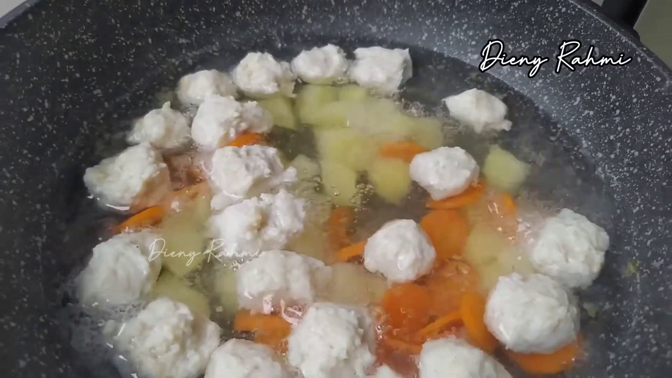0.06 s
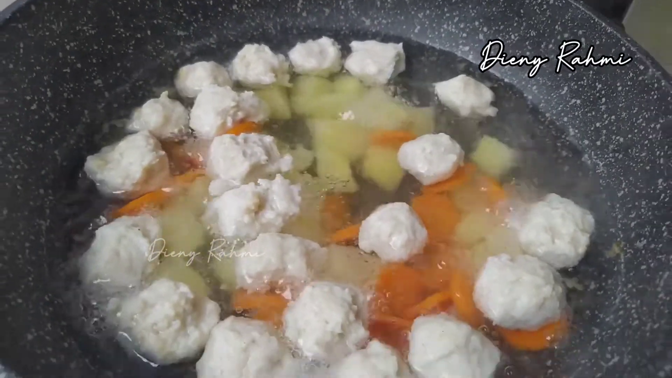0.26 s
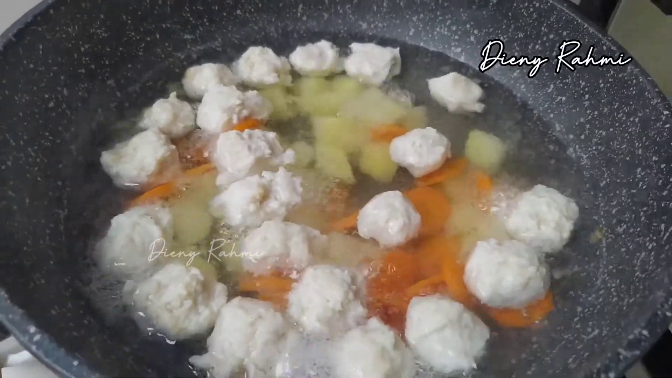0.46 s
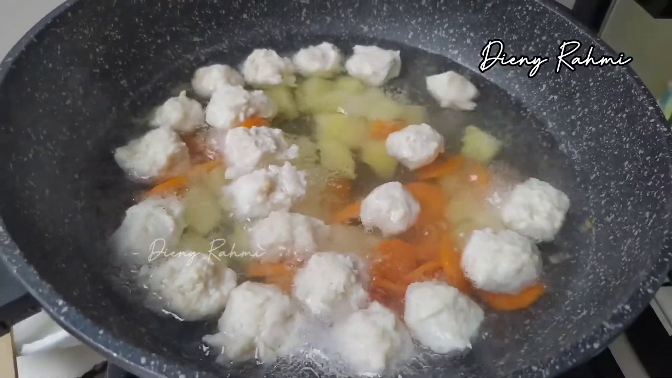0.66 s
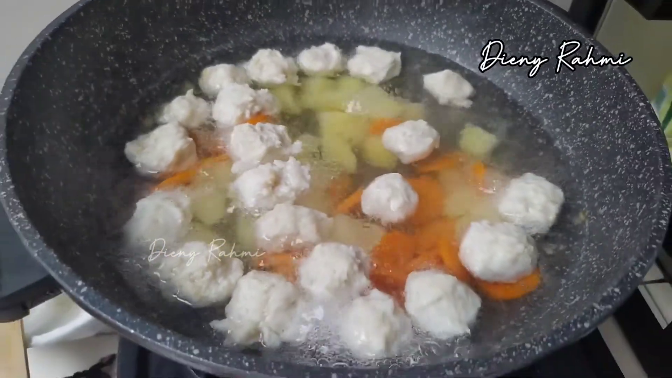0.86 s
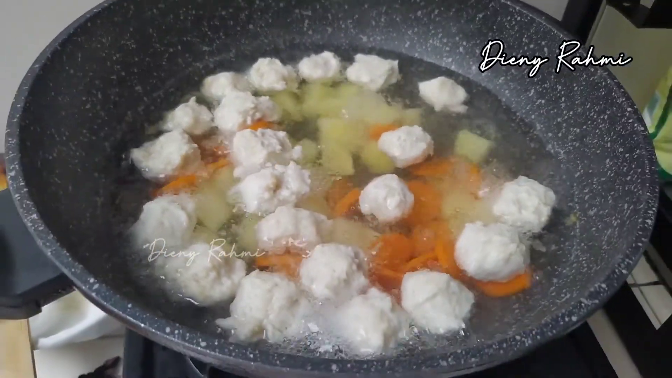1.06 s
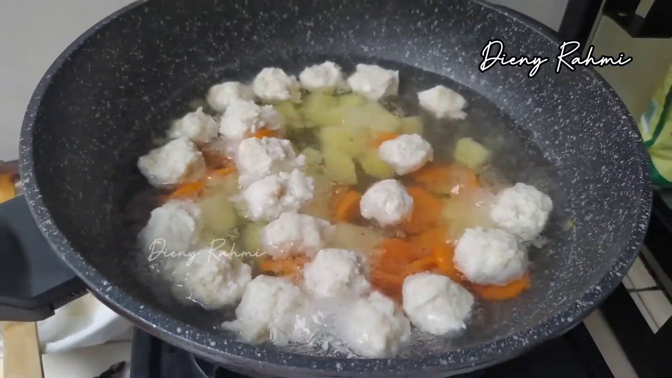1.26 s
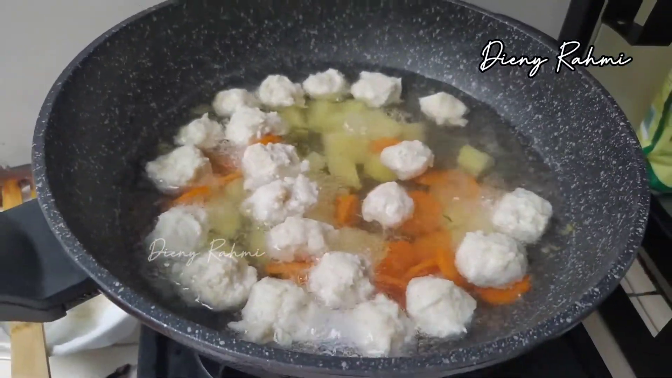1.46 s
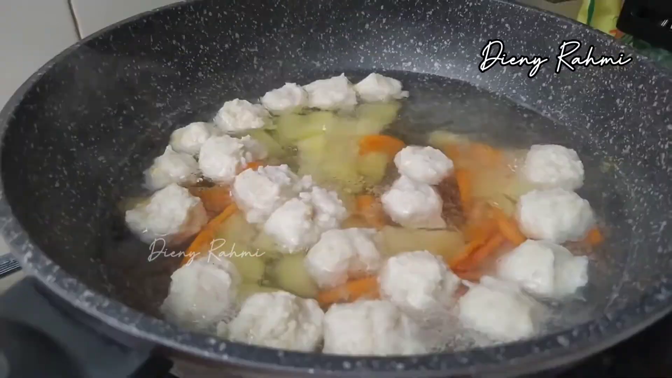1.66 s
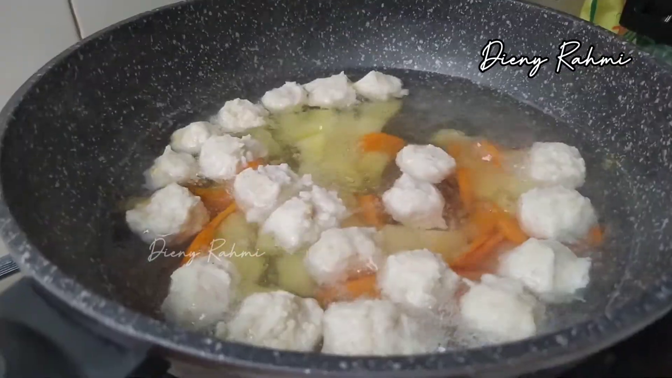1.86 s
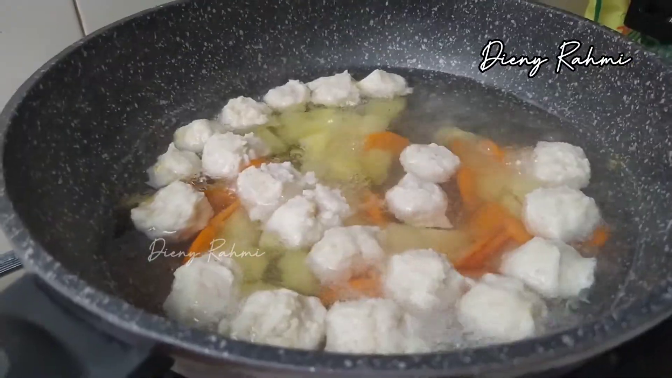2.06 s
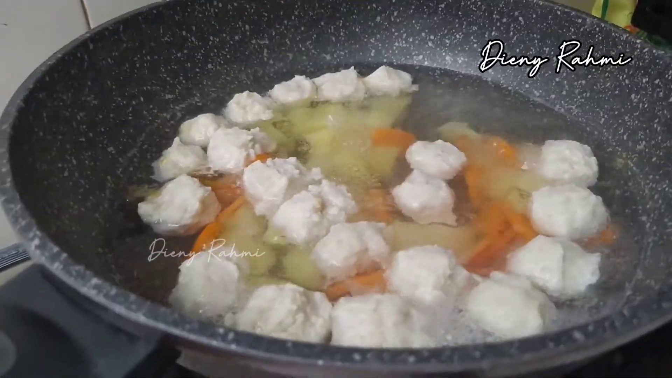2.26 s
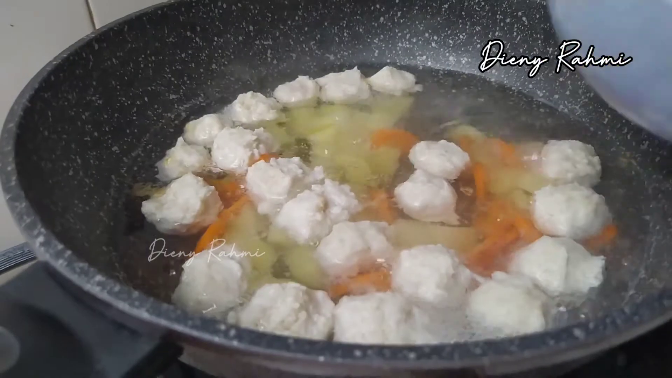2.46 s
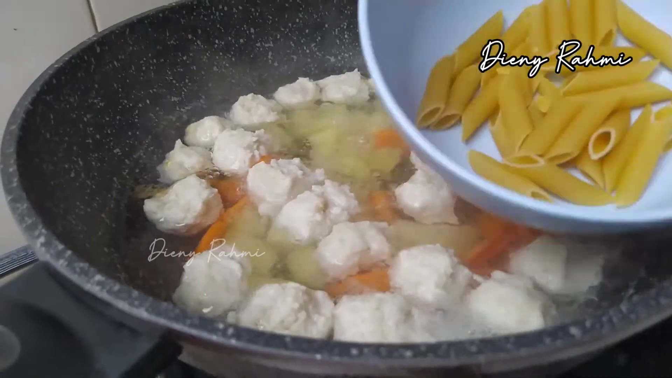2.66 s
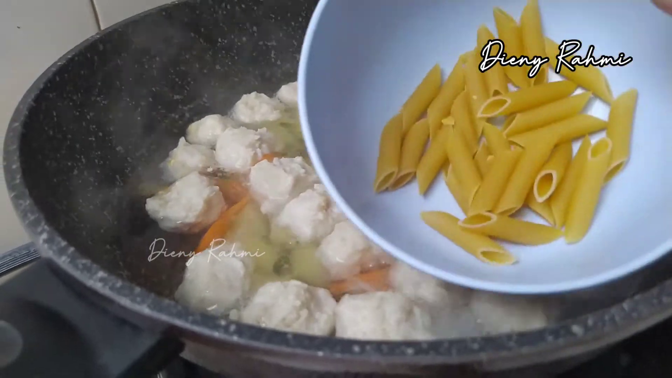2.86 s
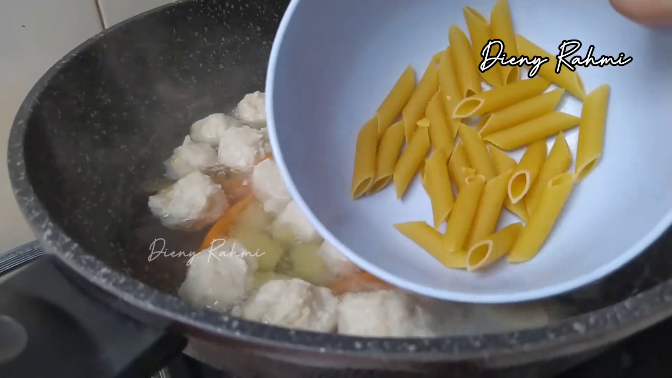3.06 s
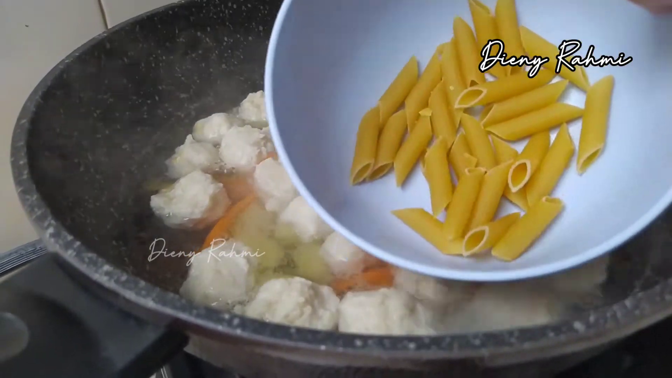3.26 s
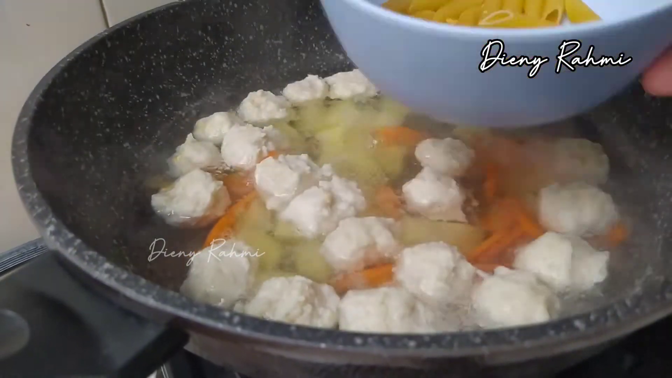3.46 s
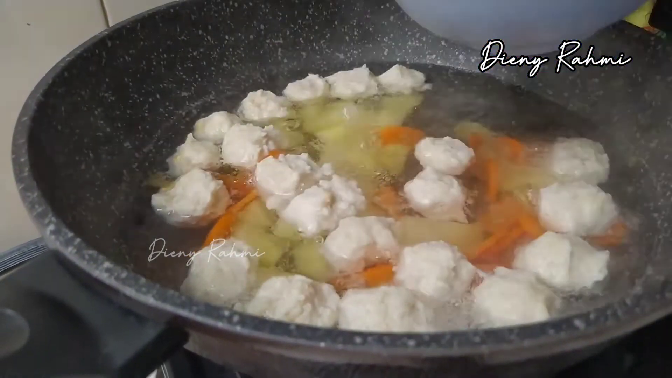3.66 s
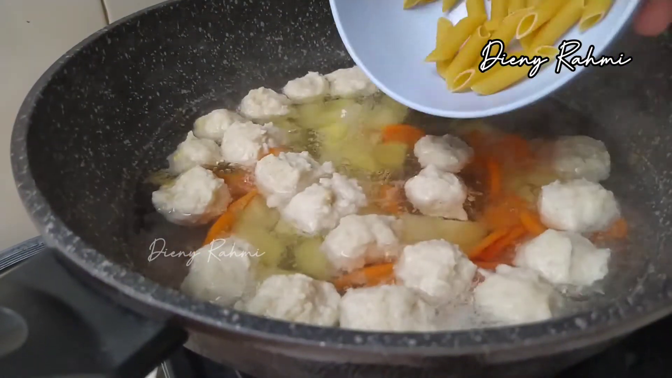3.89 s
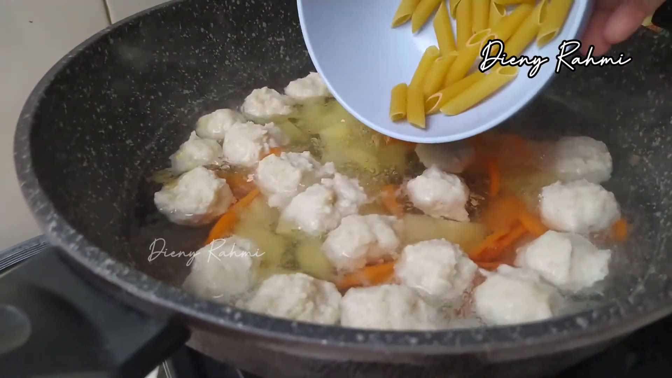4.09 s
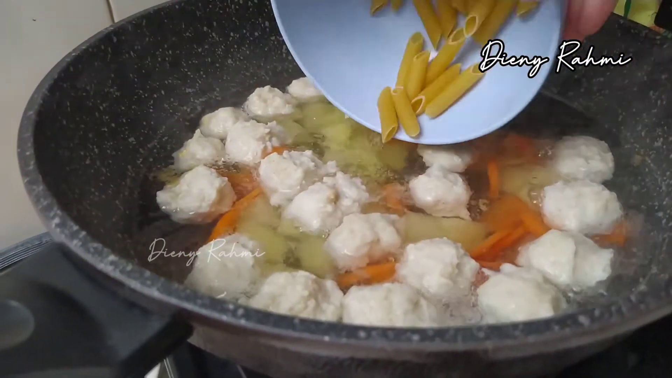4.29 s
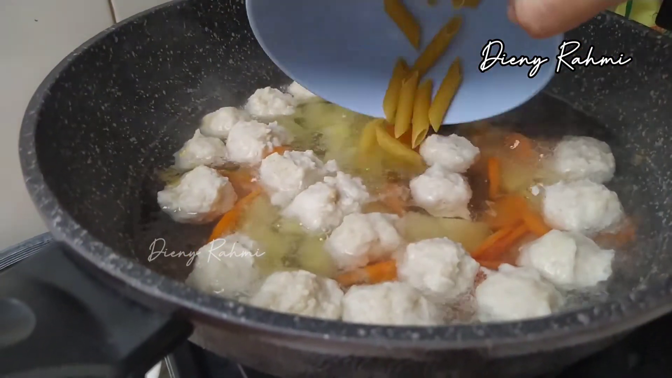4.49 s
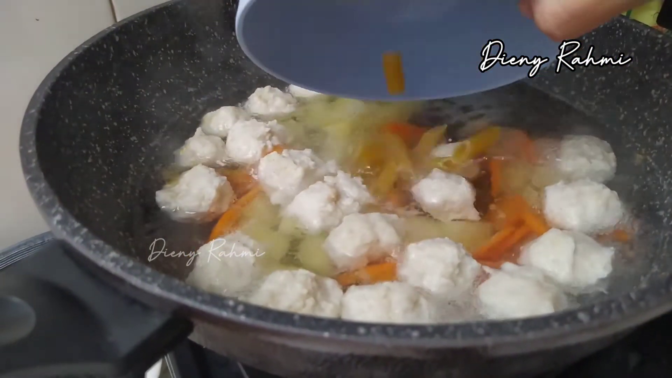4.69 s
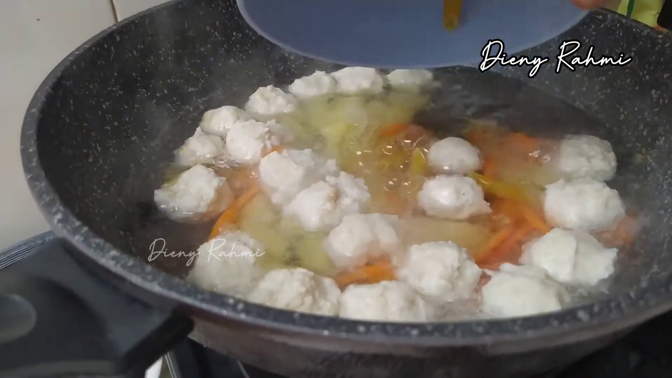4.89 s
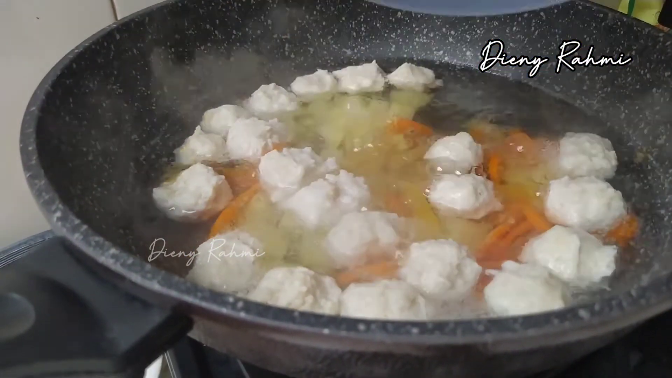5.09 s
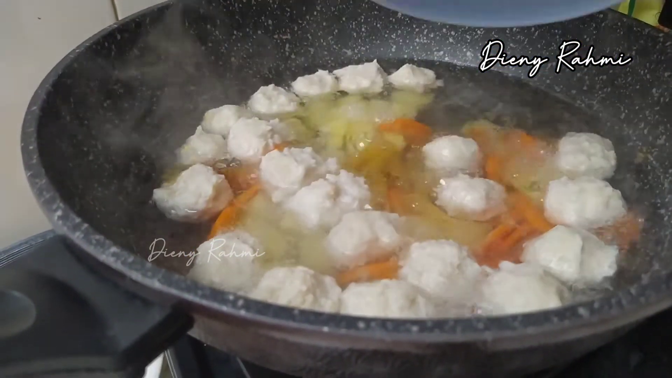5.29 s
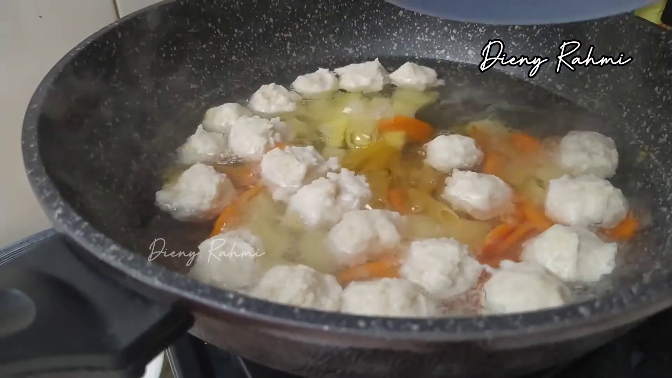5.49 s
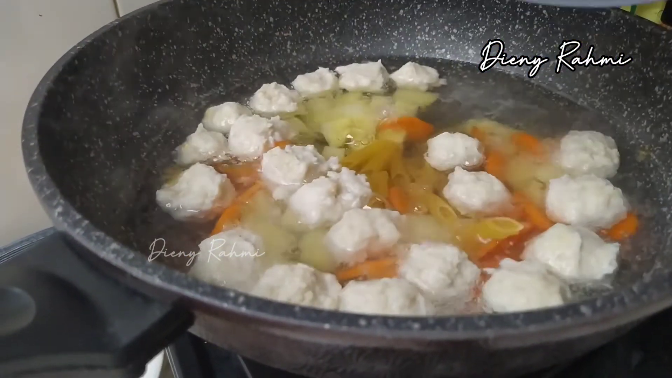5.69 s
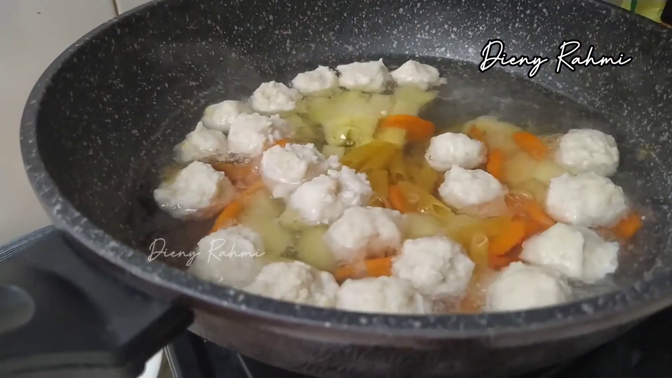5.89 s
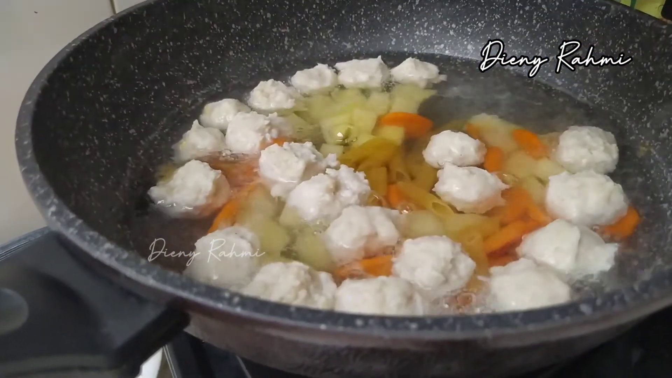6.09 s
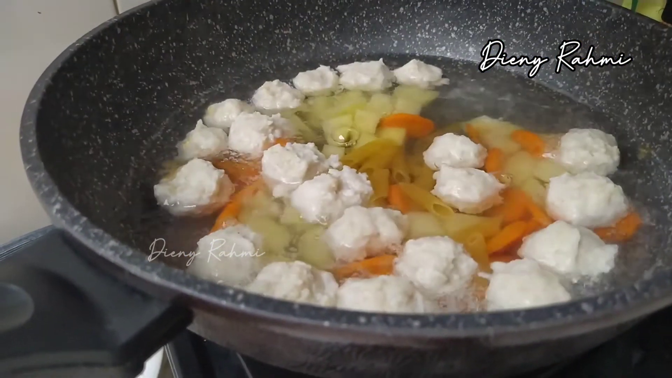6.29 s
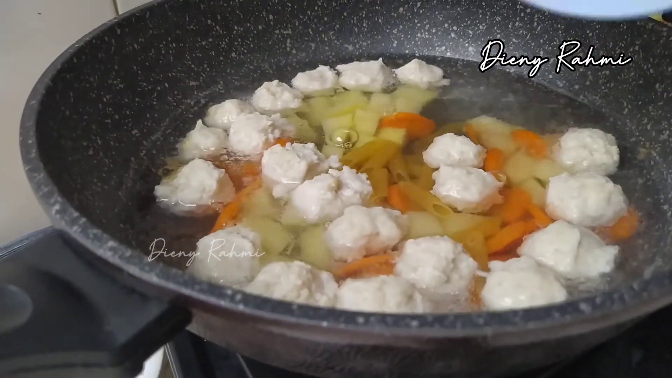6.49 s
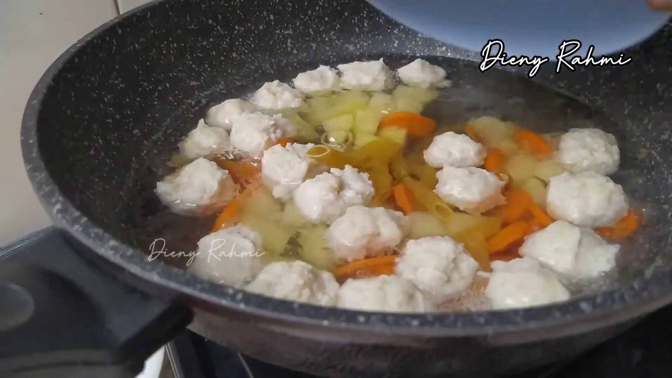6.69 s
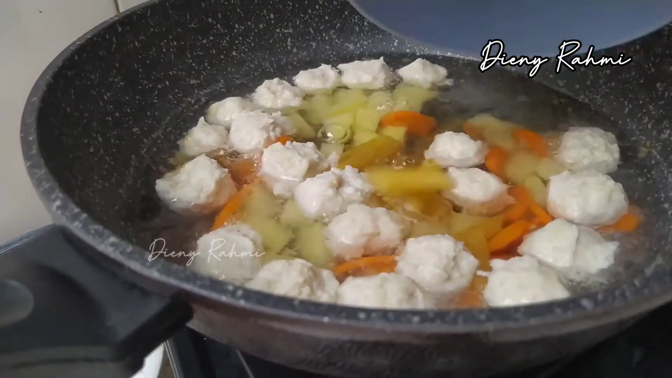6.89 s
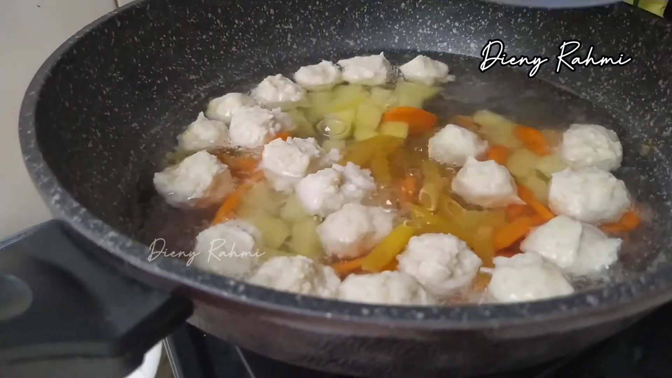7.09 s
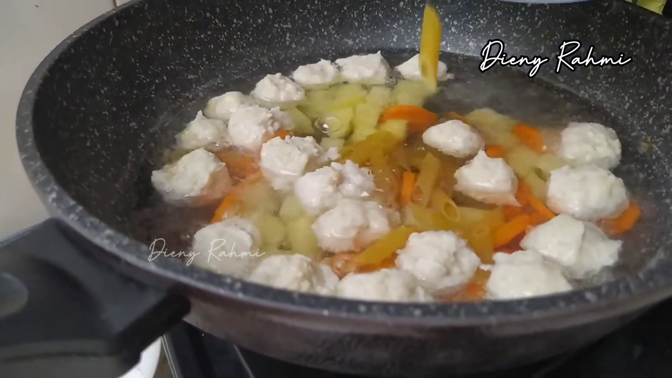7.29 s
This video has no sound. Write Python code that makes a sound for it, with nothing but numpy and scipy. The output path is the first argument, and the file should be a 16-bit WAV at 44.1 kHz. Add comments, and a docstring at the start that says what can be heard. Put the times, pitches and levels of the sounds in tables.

```python
"""Dry pasta tubes rattle in a plastic bowl, first at the left, then slide and drop into simmering soup.
Noisy contacts excite damped modes of tubes, bowl wall and the air in the bowl; bubbles plop as rising sines.
The soup gurgles by dense low resonances, and a tiled kitchen answers with sparse echoes that decay by band.
Shaped noise makes the simmer and a low rumble, two sines a faint hum; all falls silent briefly near 1.5 s.
"""
import sys
import numpy as np
from scipy import signal
from scipy.fft import rfft, irfft
from scipy.io import wavfile
from scipy.ndimage import uniform_filter1d

SR = 44100
rng = np.random.default_rng(int(sys.argv[2]) if len(sys.argv) > 2 else 0)


def transcribe(signal):
    """Save signal, clipped to [-1, 1], as a 16-bit WAV file at the path in sys.argv[1]."""
    frames = np.atleast_2d(signal).T
    limited = np.clip(frames, -1, 1)
    pcm = np.round(limited * 32767).astype(np.int16)
    wavfile.write(sys.argv[1], SR, pcm)


N = 323870

# Loudest knocks of tube on tube or bowl. Each row: nominal time in seconds, tube level in dB before
# balance, nominal strongest ring in Hz, bowl level relative to the tube in dB, contact time scale in ms.
KNOCK_EVENTS = [(1.5541, -4.5, 6050, -22, 2.6), (1.5764, -11.5, 5840, -15, 2),
                (1.5925, -13.5, 11400, -15, 1.9), (1.6531, -24, 5960, -15, 2),
                (1.6791, -14.5, 7200, -7.5, 2.4), (1.691, -6.5, 11300, -20, 2.9),
                (1.7003, -15.5, 6600, -14, 1.9), (1.7677, -3, 10700, -15.5, 1.7),
                (1.7791, -7, 10900, -13, 3.1), (1.7895, -12, 10700, -22, 3.2),
                (1.8048, -4, 10600, -12.5, 1.5), (1.8268, -12.5, 3900, -34, 2.4),
                (1.8348, -7, 10500, -24, 2.2), (1.8774, -13.5, 10600, -7.5, 2.3),
                (1.886, -14, 10500, -21, 2.5), (1.9093, -11, 10430, -17, 2.9),
                (1.9428, -11, 6640, -12, 3.3), (1.9496, -10.5, 6350, -17, 1.8),
                (1.9654, -14.5, 11100, -7, 2.6), (2.0358, -27, 2050, -5, 2), (2.0594, -23.5, 4040, -4, 1.8),
                (2.087, -25, 10800, -15, 1.2), (2.1214, -23.5, 10500, -28, 2.3),
                (2.1502, -24.5, 4200, -9, 1.3), (2.1784, -32, 9500, -6, 2), (2.4024, -44, 1560, -17, 2),
                (2.4783, -34, 9180, -27, 2), (2.5038, -27, 11400, -19, 2.7), (2.5717, -40, 2210, -2, 2),
                (2.6125, -41, 2550, -12, 1.7), (2.649, -38, 1910, -16, 2), (2.664, -21.5, 3970, -21, 1.8),
                (2.6828, -27, 3700, -8, 2.8), (2.9656, -22.5, 10000, -10, 2.1),
                (2.9778, -21, 4570, -7, 2.3), (2.9944, -22.5, 5400, -13, 2), (3.043, -19, 9600, -21, 2.4),
                (3.053, -15.5, 10000, -12, 1.6), (3.1322, -9, 9600, -15.5, 2.3),
                (3.1614, -23, 9600, -3.5, 2), (3.6296, -28, 5300, -16, 2.4),
                (3.6692, -31.5, 10500, -12, 2.9), (3.8883, -14.5, 6170, -18, 2.5),
                (3.923, -10.5, 6260, -23, 2.5), (3.9889, -3.5, 5860, -22.5, 3),
                (4.0153, -8, 6400, -19.5, 2.2), (4.0777, -8, 6160, -25, 2), (4.0968, -13.5, 7500, -18, 2.7),
                (4.1366, -21.5, 6080, -10, 1.7), (4.2305, -12, 6300, -21.5, 1.75),
                (4.402, -22, 6070, -21, 3.7), (4.4734, -2.5, 8500, -19.5, 2.55),
                (4.555, -4, 6140, -26, 2.7), (4.5767, -16, 6050, -6.5, 2.2), (4.6102, -14, 1730, -22, 2.4),
                (4.6283, -17, 6160, -5, 2.2), (4.643, -7, 6100, -28, 2.3), (4.6538, -5.5, 6100, -33, 1.7),
                (4.6794, -1.5, 6300, -11.5, 3.4), (4.7172, -5.5, 9240, -19, 2.5),
                (4.7319, -9, 1860, -4, 2.6), (4.7696, -9.5, 10600, -7, 2.14),
                (4.9291, -2.5, 6440, -13, 2.4), (4.9513, 5.5, 8610, -20.5, 1.74),
                (4.9998, -13, 6440, -5, 2.7), (5.0331, -15, 3020, -3.5, 2.4), (5.2038, -34.5, 2370, -9, 2),
                (5.252, -39, 2500, -13, 2), (5.5499, -35, 2800, 2.5, 1.6), (5.5747, -2, 9800, -22.5, 2.8),
                (5.6025, 3, 6420, -21.5, 2.1), (5.6105, -8, 6030, -15, 1.7),
                (5.7324, -5.5, 5830, -12.5, 3.2), (5.7608, -2.5, 6530, -14.5, 2.4),
                (5.775, 2.5, 8300, -21.5, 2.4), (5.7888, -26, 5930, -38, 1.3),
                (6.5106, -32.5, 9500, -33, 2), (6.6686, -15.5, 10530, -6, 2.04),
                (6.7158, -32, 10900, -2, 2.2), (6.769, -6.5, 4060, -16, 2.6), (6.7803, -9, 3950, -9, 3),
                (6.79, -5, 5680, -12, 2.4), (6.8443, -2, 8200, -13, 2.9), (6.8645, 8.5, 6430, -19.5, 2.6),
                (6.8725, 4.5, 6280, -12, 1.93), (6.9213, -11, 9000, -16, 2.4), (6.9494, -8.5, 4180, -18, 2),
                (6.965, -10, 9700, -11, 2), (7.023, -15.5, 3260, -3.5, 2), (7.087, -16, 2270, -5, 2.9),
                (7.1753, -29, 5950, -0.5, 2), (7.2115, -34, 3600, -4, 2)]
# Ringing modes of a tube. Each row: nominal frequency in Hz, resonance width in Hz,
# mean level in dB before the strike is normalized.
TUBE_MODES = [(5930, 144, -1), (6270, 350, -4.5), (6900, 1100, -8), (7780, 990, -7), (8140, 1100, -4),
              (9140, 1220, -4.5), (10810, 255, -1), (11400, 780, -11), (12800, 1300, -19),
              (14500, 12000, -22)]
# The heap lands in the hollow of the bowl. Each row: start in seconds, peak level in dB before balance.
LANDING_THUDS = [(1.785, -23.5), (1.968, -20.5), (3.134, -31)]
# Modes of the air in the bowl. Each row: nominal frequency in Hz, resonance width in Hz,
# mean level in dB before normalization.
HOLLOW_MODES = [(660, 450, -27.5), (871, 220, 4), (1003, 360, 3)]
THUD_MS = 2.3  # contact time scale of the heap landing
RING_DB, RING_DB_PER_OCTAVE = 3, -3  # mean level of the strongest ring at 6 kHz, and its slope in pitch
SCATTER_DB = 2.5  # the tubes lie scattered: random left-right balance of each knock


def knocks(favour_width=0.17):
    """Modal excitation: each knock rings a tube, with one favoured mode, and the bowl wall."""
    out = np.zeros((2, N))
    for s, db, hz, share_db, contact_ms in KNOCK_EVENTS:
        favour_db = RING_DB + RING_DB_PER_OCTAVE * np.log2(hz / 6000)
        favoured_mode = (hz, favour_width * hz, favour_db)
        tube = strike(TUBE_MODES + [favoured_mode], contact_ms)
        bowl = gain_of(share_db) * strike(wall_modes(s), contact_ms)
        pan_db = balance(s) + SCATTER_DB * rng.standard_normal()
        add(out, s - .001, gain_of(db) * placed(tube + bowl, s, pan_db))
    for s, db in LANDING_THUDS:
        thud = strike(HOLLOW_MODES, THUD_MS)
        add(out, s, gain_of(db) * placed(thud, s, balance(s)))
    return out


# Tubes sliding in a heap, one sub-table a shake. Each row: time in seconds, gain in dB of the tube rattle,
# gain in dB of the bowl wall with its air; gains apply before balance and are interpolated in time.
HEAP_SHAKES = [
    [(1.54, -60, -43.5), (1.61, -36.5, -45.5), (1.74, -40, -47.5), (1.78, -24, -33), (1.83, -35, -36.5),
     (1.92, -50, -41), (2.03, -47, -45), (2.16, -78, -44), (2.22, -79, -51)],
    [(2.4, -73, -92), (2.484, -44, -66), (2.574, -60, -59), (2.688, -76, -45), (2.772, -72, -59.5)],
    [(2.86, -78, -61.5), (2.954, -48, -48), (3.054, -51, -45.5), (3.176, -71, -57), (3.234, -82, -80)],
    [(3.52, -84, -77), (3.622, -48, -49.5), (3.778, -70, -66)],
    [(3.8, -68, -56.5), (3.942, -31.5, -48), (4.04, -33, -48.5), (4.082, -29, -50), (4.21, -50, -56),
     (4.3, -45, -59)],
    [(4.3, -51, -62), (4.458, -35.5, -49), (4.582, -30, -37), (4.632, -36, -36.5), (4.68, -23, -31.5),
     (4.756, -50.5, -32.5), (4.85, -60, -53.5), (4.926, -74, -62), (5.02, -58, -35), (5.122, -52, -60),
     (5.3, -83, -59)],
    [(5.56, -63, -67), (5.624, -24, -71), (5.718, -37, -47), (5.806, -27.5, -61), (5.906, -36.5, -51.5),
     (5.976, -47.5, -82), (6.08, -65, -80)],
    [(6.7, -74, -60), (6.854, -50, -54), (6.914, -18.5, -45), (6.964, -25.5, -33.5), (7.014, -32.5, -52),
     (7.11, -52, -53), (7.194, -70, -51.5), (7.33, -68, -79)],
]
# Gain of the bowl air beside the wall; from TIPPED_S seconds the upturned bowl hardly rings.
HOLLOW_DB, HOLLOW_TIPPED_DB, TIPPED_S = -3.5, -21, 4.3


def heap():
    """Superposition of many small impacts: sliding tubes chatter on each other and on the shaken bowl."""
    t = np.arange(N) / SR
    tubes = rattle(TUBE_MODES, 500, 1.5)
    air = rattle(HOLLOW_MODES, 300, 1.6)
    gripped = rattle(wall_modes(t[0]), 250, 1.24)
    free = rattle(wall_modes(t[-1]), 250, 1.24)
    air_gain = gain_of(np.where(t < TIPPED_S, HOLLOW_DB, HOLLOW_TIPPED_DB))
    bowl = np.where(t < AT_LEFT_UNTIL_S, gripped, free) + air * air_gain
    out = np.zeros((2, N))
    for rows in HEAP_SHAKES:
        s = rows[0][0]
        first, last = round(s * SR), round(rows[-1][0] * SR)
        shake = gain_of(curve(rows, 1)) * tubes + gain_of(curve(rows, 2)) * bowl
        fades = signal.windows.tukey(last - first, .04)
        out[:, first:last] += placed(shake, s, balance(s))[:, first:last] * fades
    return out


# Tubes entering the soup. Each row: start in seconds, amplitude in dB before the onset ramp and decay,
# starting bubble pitch in Hz.
BUBBLE_PLOPS = [(4.52, -23.5, 770), (4.541, -19.5, 656), (4.59, -25, 970), (4.644, -26, 640),
                (4.689, -22, 740), (4.733, -13.5, 723), (4.759, -18.5, 660), (4.779, -19.5, 683),
                (4.955, -30, 1200), (5.601, -31, 544), (5.763, -30, 1240), (6.669, -29, 387),
                (6.771, -22, 1190), (6.865, -16.5, 1180), (7.02, -25, 403), (7.131, -29, 680)]
PLOP_T60_S = 0.023


def plops(rise=8.0):
    """Bubble resonance: trapped air rings low and climbs in pitch as it nears the surface."""
    out, t = np.zeros((2, N)), np.arange(4000) / SR
    for s, db, hz in BUBBLE_PLOPS:
        decay = gain_of(db - 60 * t / PLOP_T60_S)
        ring = np.sin(2 * np.pi * hz * (t + rise * t ** 2)) * decay
        onset = np.minimum(t / 0.0034, 1)
        add(out, s, np.array([ring, ring]) * onset)
    return out


# The soup gurgles up, most of all as tubes go in. Each row: crest time in seconds, crest gain in dB.
SLOSH_SWELLS = [(3.9, -52), (4.1, -54), (4.61, -49), (4.73, -41.5), (5.03, -57), (5.604, -61), (5.75, -58),
                (5.88, -57), (6.68, -44), (6.87, -39.5), (7.03, -45.5)]
# Low gurgle of the soup. Each row: nominal frequency in Hz, resonance width in Hz,
# mean level in dB before normalization.
SOUP_MODES = [(173, 32, 6), (223, 100, 2), (351, 120, 2.5), (524, 256, -1)]
SLOSH_RISE_S, SLOSH_T60_S = 0.03, 0.33


def slosh():
    """Resonant excitation under an envelope: uneven low gulps of soup around the sinking tubes."""
    return rattle(SOUP_MODES, 250, 2.6) * swells(SLOSH_SWELLS, SLOSH_RISE_S, SLOSH_T60_S)


# Echo of the room, interpolated between rows. Each row: frequency in Hz, decay time T60 in seconds,
# level in dB before the right side's own gain.
KITCHEN_DECAY = [(300, 0.33, -7), (1500, 0.23, -3.5), (3020, 0.32, -1.5), (4800, 0.32, -3),
                 (6100, 0.38, -5.5), (10500, 0.31, -5.5), (12700, 0.1, -6.5), (15100, 0.19, -12)]


def kitchen(x):
    """Frequency-dependent reverberation: sparse random-sign echoes die at each band's own speed."""
    length, spacing = SR // 2, 12  # samples
    taps = np.zeros((2, length))
    jitter = rng.integers(0, spacing, (2, (length - 161) // spacing))
    at = np.arange(160, length - spacing, spacing) + jitter
    np.put_along_axis(taps, at, rng.choice([-1., 1.], at.shape), 1)
    taps[1] = 0.028 * taps[0] + 1.28 * taps[1]  # both sides share a little of the echo
    hz, t, spectra = signal.stft(taps, SR, nperseg=256)
    band, t60, db = np.transpose(KITCHEN_DECAY)
    t60 = np.interp(hz, band, t60)[:, None]
    db = np.interp(hz, band, db)[:, None]
    fall = gain_of(-60 * t / t60)
    energy = (fall ** 2).sum(axis=1, keepdims=True) * 128 / spacing
    fall = fall * gain_of(db) / np.sqrt(energy)  # level is independent of decay time
    echo = signal.istft(spectra * fall, SR, nperseg=256)[1]
    return signal.fftconvolve(x, echo, axes=1)[:, :N]


# Spectrum of soup, burner and house. Each row: frequency in Hz, relative density in dB per Hz.
SIMMER_SPECTRUM = [(20, -13.5), (60, -14), (140, -17.5), (205, -13), (280, -19), (850, -30), (1170, -23.5),
                   (1350, -34.5), (2500, -33), (3300, -39), (5800, -38), (7200, -31.5), (10400, -29.5),
                   (12300, -33.5), (12900, -45), (15900, -43)]
# Likeness of the two sides. Each row: frequency in Hz, left-right correlation from -1 to 1.
SIDE_LIKENESS = [(60, 0.43), (180, 0.95), (550, 0.42), (1650, 0.18), (4970, -0.11), (15000, 0.026)]
SIMMER_DB = -49  # rms


def simmer(swell_db=-0.04, swell_s=0.14):
    """Spectrally shaped noise: a steady floor with drifting patches and a slow slight swell."""
    frames, hz = N // 512 + 5, np.fft.rfftfreq(2048, 1 / SR)
    a, b, c, d, patches = rng.standard_normal((frames, 1025, 5)).T
    patches = uniform_filter1d(patches, size=10, axis=0)  # across pitch
    patches = evened(uniform_filter1d(patches, size=8, axis=1))  # across time
    swell_frames = max(round(swell_s * SR / 512), 1)
    swell = evened(uniform_filter1d(rng.standard_normal(frames), swell_frames))
    same = np.clip(read(SIDE_LIKENESS, hz), -1, 1)[:, None]
    left = a + 1j * b
    right = same * left + np.sqrt(1 - same ** 2) * (c + 1j * d)
    level_db = read(SIMMER_SPECTRUM, hz)[:, None] + patches + swell_db * swell
    spectra = np.array([left, right]) * gain_of(level_db)
    noise = signal.istft(spectra, nperseg=2048, noverlap=1536)[1][:, :N]
    return gain_of(SIMMER_DB) * evened(noise)


# Gusts of low rumble. Each row: crest time in seconds, gain in dB added to the resting gain.
RUMBLE_GUSTS = [(0.67, -35), (2.35, -53), (3.19, -61), (4.4, -55), (5.76, -51), (6.85, -54)]
RUMBLE_DB = -59.5  # air and hands on the microphone, at rest
GUST_RISE_S, GUST_T60_S = 0.058, 1.23


def rumble(low_hz=8, top_hz=28, apart=0.12):
    """Band-limited noise with partial coherence: very low gusts, partly shared by both sides."""
    band = signal.butter(4, [low_hz, top_hz], "band", fs=SR, output="sos")
    common, left, right = signal.sosfilt(band, rng.standard_normal((N, 3)).T)
    level = gain_of(RUMBLE_DB) + swells(RUMBLE_GUSTS, GUST_RISE_S, GUST_T60_S)
    return level * evened(common + apart * np.array([left, right]))


# A faint far hum swells twice. Each row: crest time in seconds, rms of the fundamental at the crest in dB.
HUM_SWELLS = [(1.305, -51), (1.44, -52.5)]
HUM_HZ, HUM_SAG_HZ_PER_S, OCTAVE_DB = 312, 25, -12.5  # pitch at the first crest, its fall, octave level
HUM_RISE_S, HUM_T60_S = 0.037, 0.59


def hum():
    """Harmonic addition: a soft tone and its octave sag a little and do not return after the silence."""
    t = np.arange(N) / SR - HUM_SWELLS[0][0]
    turns = HUM_HZ * t - HUM_SAG_HZ_PER_S * t ** 2 / 2
    tone = np.sin(2 * np.pi * turns) + gain_of(OCTAVE_DB) * np.sin(4 * np.pi * turns)
    before_end = np.arange(N) < SILENCE_S[1] * SR
    return np.sqrt(2) * tone * swells(HUM_SWELLS, HUM_RISE_S, HUM_T60_S) * before_end


def strike(modes, contact_ms, spread_db=3.0, detune=0.022, beam_hz=16000, size=2048):
    """Resonance: a scratchy contact rings varied modes, whose phases part between the sides in the treble."""
    hz, width, db = np.transpose(modes)[:, :, None]
    level_draw, pitch_draw, side_draw = rng.standard_normal((3, len(modes), 1))
    f, ms = np.fft.rfftfreq(size, 1 / SR), np.arange(size) * 1000 / SR
    offset = (f - hz * (1 + detune * pitch_draw)) / width
    shape = gain_of(db + spread_db * level_draw) / (1 + 2j * offset) ** 2
    shape = shape * (f / hz) ** 2 / (1 + (f / hz) ** 2)  # small bodies send out little bass
    beams = np.exp(1j * np.array([1, -1])[:, None, None] * side_draw * hz / beam_hz)
    contact = rng.standard_normal(size) * (ms / contact_ms) * np.exp(-2 * ms / contact_ms)
    contact = rfft(contact)
    contact = contact / (abs(contact) + 1e-9) ** .7  # a hard contact drives all pitches about evenly
    pair = irfft(contact * (shape * beams).sum(axis=1), size)
    pair = pair * np.hanning(2 * size)[size:]
    pair = np.roll(pair, 24, axis=1) * (np.arange(size) >= 24)  # silent lead-in
    return pair / abs(pair).max()


def rattle(modes, per_s, uneven_db, count=14):
    """Random impact train: dense small contacts of uneven size share a few strikes, at rms 1."""
    size = gain_of(uneven_db * np.minimum(rng.exponential(1, N), 4))
    size = size * (rng.random(N) < per_s / SR)
    which = rng.integers(0, count, N)
    out = np.zeros((2, N))
    for k in range(count):
        hits = (size * (which == k))[None]
        out += signal.oaconvolve(hits, strike(modes, 1.0), axes=1)[:, :N]
    return evened(out)


# Modes of the bowl wall. Each row: nominal frequency in Hz, resonance width in Hz,
# mean level in dB before the grip and normalization.
BOWL_MODES = [(740, 750, -5), (1200, 185, -1), (1650, 780, -2), (2050, 634, 2.5), (2998, 1000, 2),
              (3700, 870, 0.5), (4330, 1290, -1.5)]
AT_LEFT_UNTIL_S = 2.36  # the bowl stands left of the microphones, then faces them
GRIP_DB, GRIP_BELOW_HZ = -5, 2500


def wall_modes(s):
    """Contact damping: while picked up at the left, the hand weakens the low modes of the wall."""
    modes = []
    for hz, width, db in BOWL_MODES:
        gripped = s < AT_LEFT_UNTIL_S and hz < GRIP_BELOW_HZ
        modes.append((hz, width, db + GRIP_DB * gripped))
    return modes


LEFT_DB, FRONT_DB = 7, 0.4  # left-right level difference in the bowl's two places


def balance(s):
    """Interaural level difference: left over right in dB for the bowl's place."""
    return LEFT_DB if s < AT_LEFT_UNTIL_S else FRONT_DB


def placed(pair, s, pan_db):
    """Time and level differences: from the far left, sound reaches the right 20 samples late."""
    lag = 20 if s < AT_LEFT_UNTIL_S else -1
    return np.array([pair[0], np.roll(pair[1], lag)]) * gain_of([[pan_db / 2], [-pan_db / 2]])


def swells(rows, rise_s, t60):
    """Envelope addition: each row rises smoothly to its crest and decays exponentially."""
    t, out = np.arange(N) / SR, np.zeros(N)
    for s, db in rows:
        rise = np.sin(np.pi / 2 * np.clip(1 + (t - s) / rise_s, 0, 1)) ** 2
        out += rise * gain_of(db - 60 * np.maximum(t - s, 0) / t60)
    return out


def gain_of(db):
    """Logarithmic level: turns dB into an amplitude factor."""
    return 10 ** (np.asarray(db) / 20)


def evened(x):
    """Power normalization: scales to rms 1."""
    return x / np.sqrt(np.mean(x ** 2) + 1e-20)


def read(points, hz):
    """Logarithmic pitch: interpolates a spectrum on a log-frequency axis."""
    f, value = np.transpose(points)
    return np.interp(np.log(hz + 1), np.log(f + 1), value)


def curve(rows, column):
    """Linear interpolation: one column of a table, sample by sample."""
    rows = np.array(rows)
    return np.interp(np.arange(N) / SR, rows[:, 0], rows[:, column])


def add(mix, s, sound):
    """Superposition: adds a two-channel sound at time s."""
    part = mix[:, round(s * SR):][:, :sound.shape[1]]
    part += sound[:, :part.shape[1]]


def scene():
    """Superposition of the near pasta and soup, their echo, and the background."""
    near = knocks() + heap() + plops() + slosh()
    return near + kitchen(near) + simmer() + rumble() + hum()


SILENCE_S = 1.472, 1.539  # start and end of the brief silence
EDGE_HZ = 15900  # upper band limit


def record(dry):
    """Gating, clipping and low-pass filtering: a short silence, flattened peaks, then the band limit."""
    t = np.arange(N) / SR
    audible = (t < SILENCE_S[0]) | (t > SILENCE_S[1])
    clipped = np.clip(dry * audible, -1, 1)
    lowpass = signal.firwin(511, EDGE_HZ, window=("kaiser", 9), fs=SR)
    return signal.oaconvolve(clipped, lowpass[None], "same")


dry = scene()
out = record(dry)
transcribe(out)
```